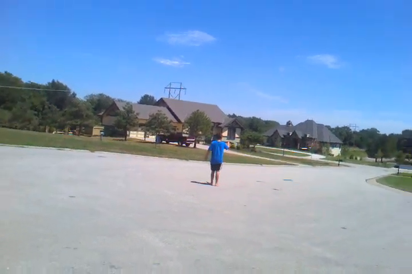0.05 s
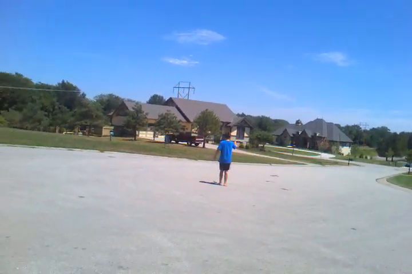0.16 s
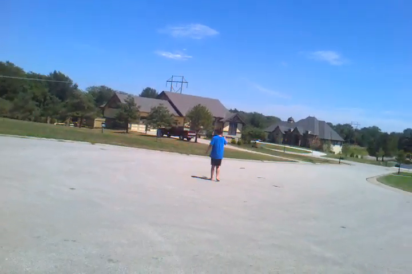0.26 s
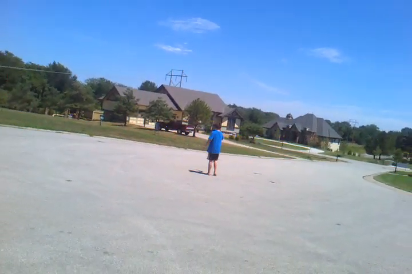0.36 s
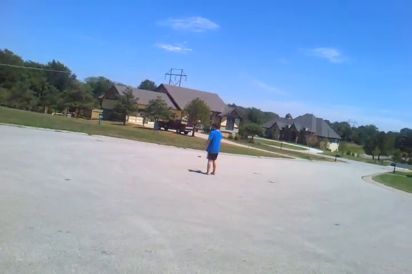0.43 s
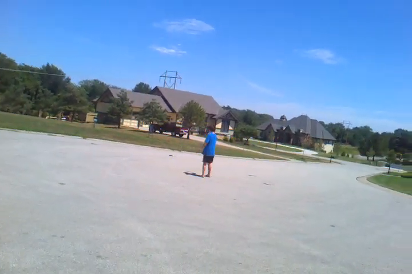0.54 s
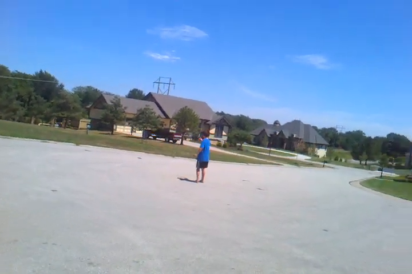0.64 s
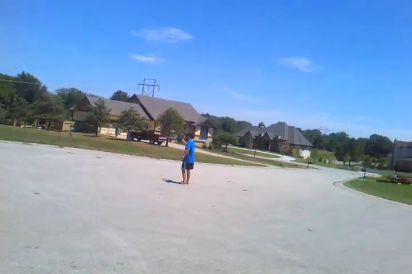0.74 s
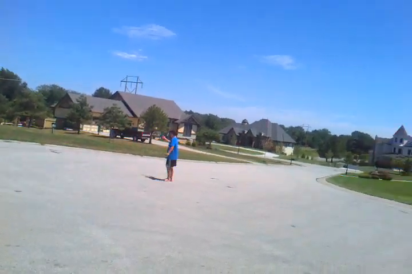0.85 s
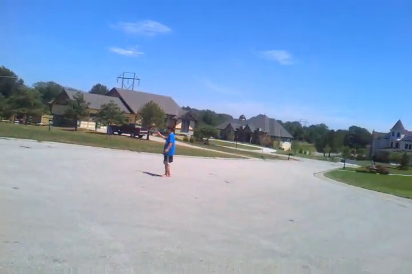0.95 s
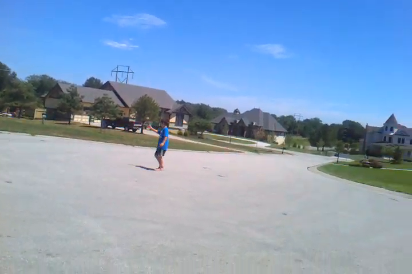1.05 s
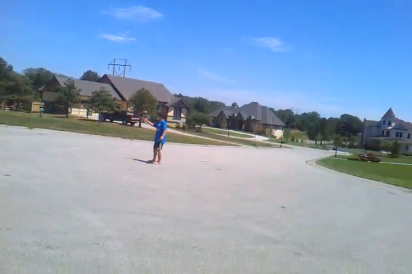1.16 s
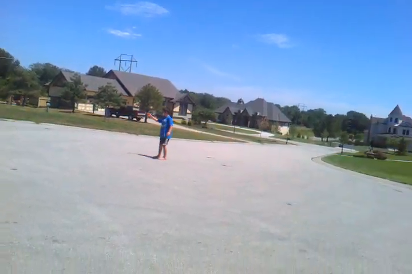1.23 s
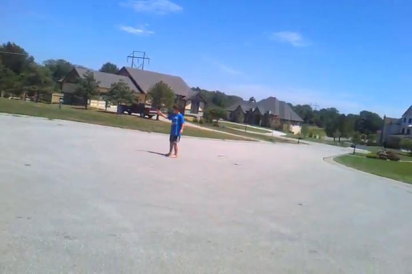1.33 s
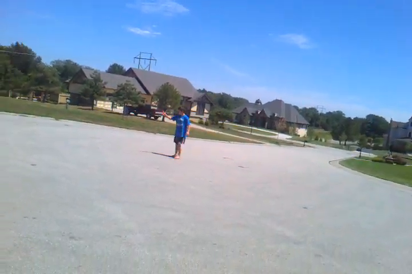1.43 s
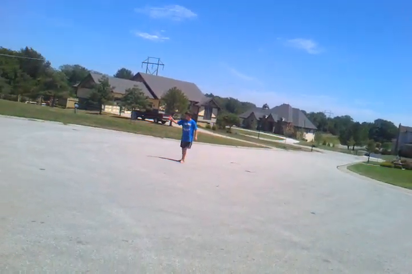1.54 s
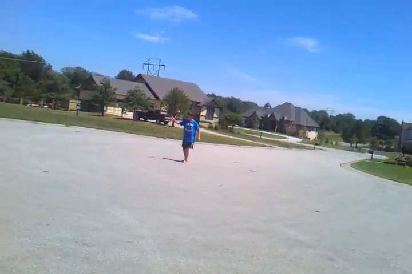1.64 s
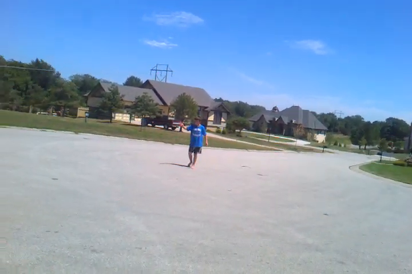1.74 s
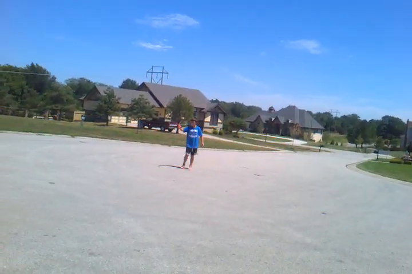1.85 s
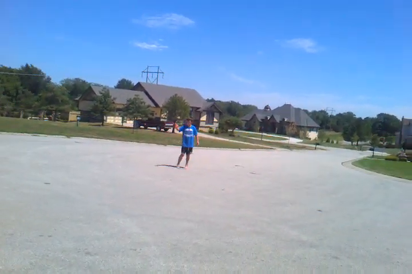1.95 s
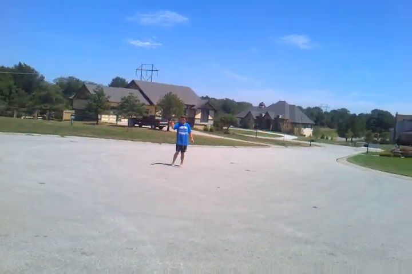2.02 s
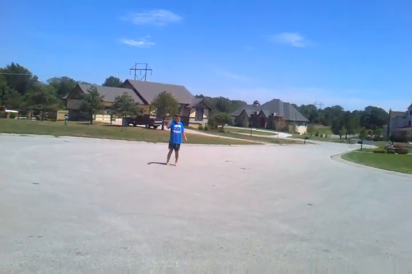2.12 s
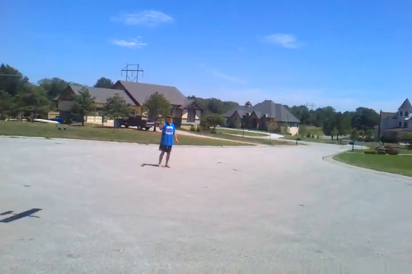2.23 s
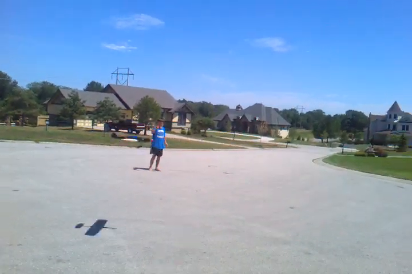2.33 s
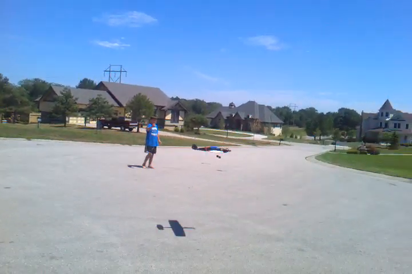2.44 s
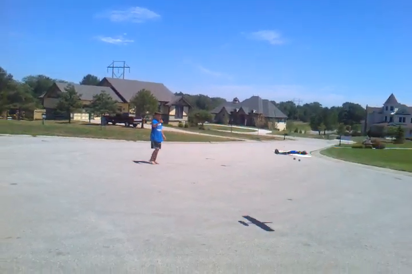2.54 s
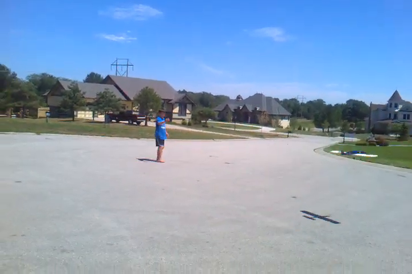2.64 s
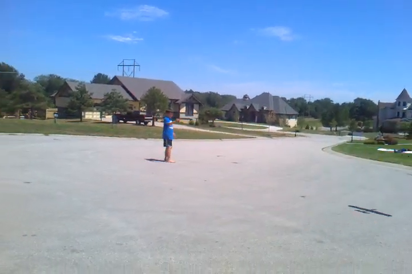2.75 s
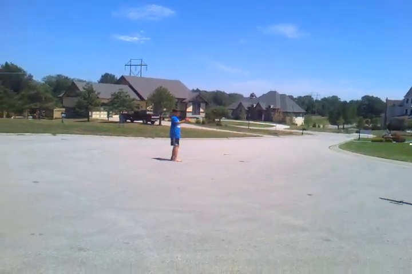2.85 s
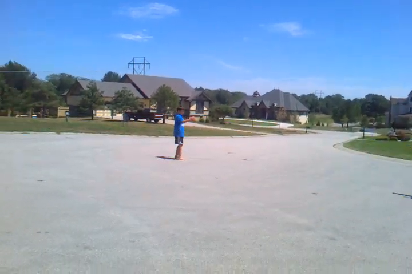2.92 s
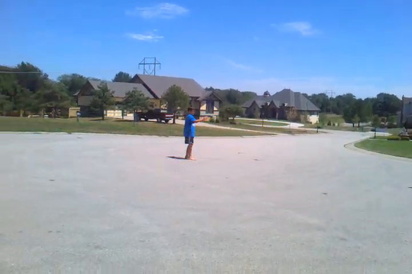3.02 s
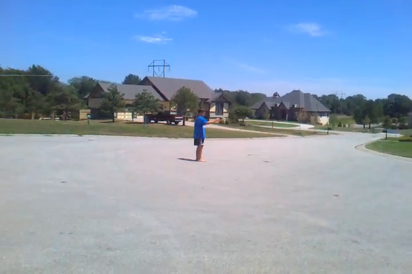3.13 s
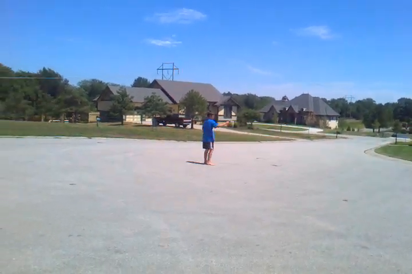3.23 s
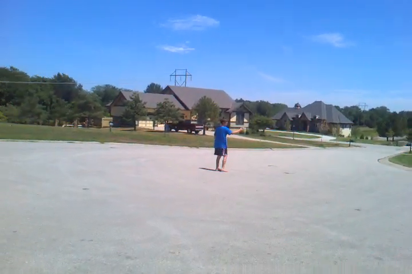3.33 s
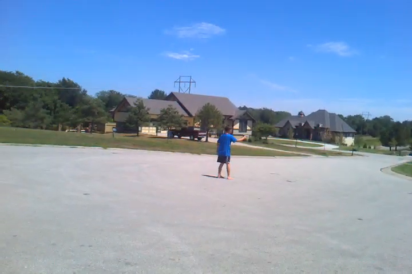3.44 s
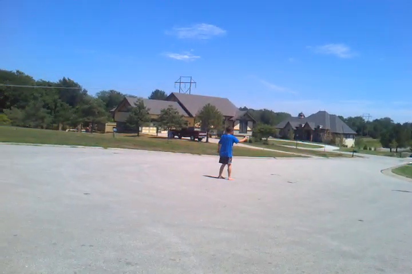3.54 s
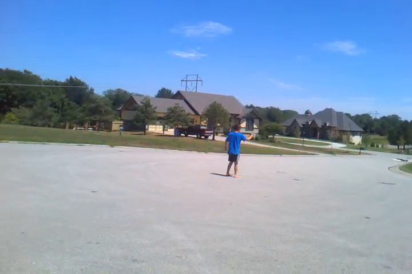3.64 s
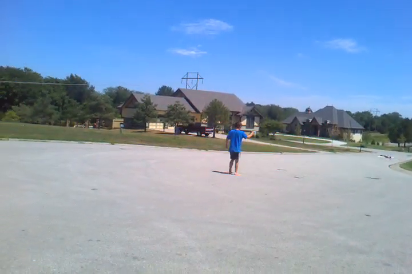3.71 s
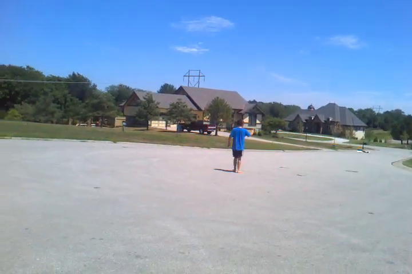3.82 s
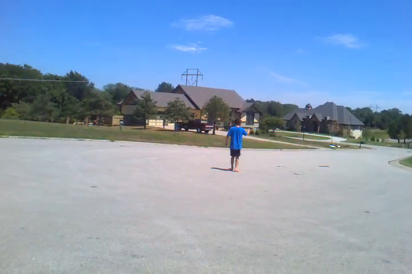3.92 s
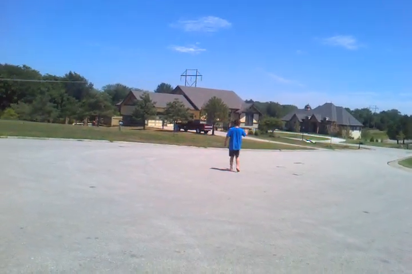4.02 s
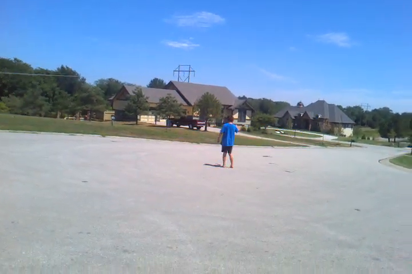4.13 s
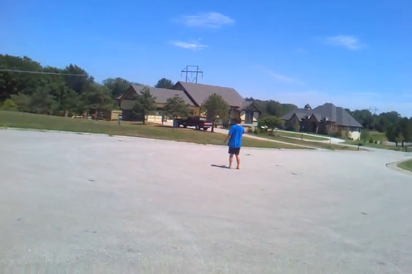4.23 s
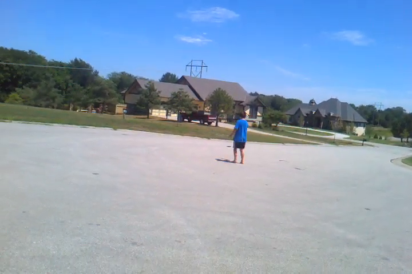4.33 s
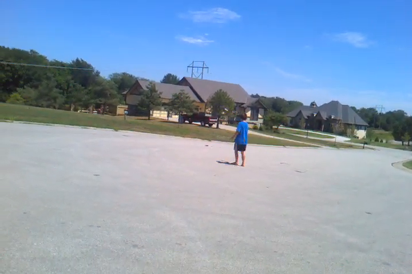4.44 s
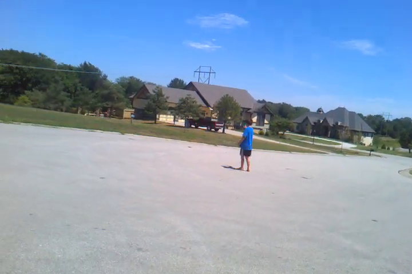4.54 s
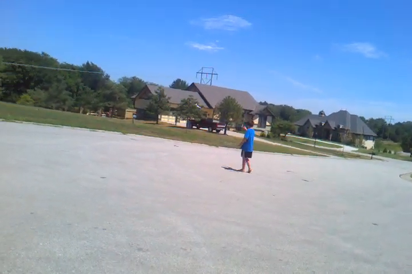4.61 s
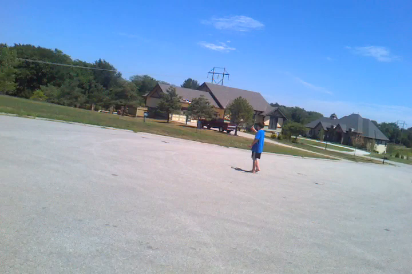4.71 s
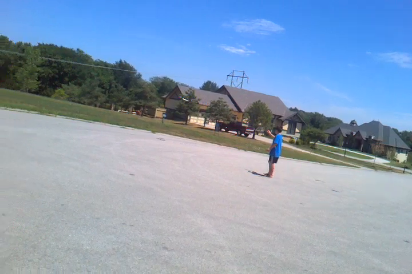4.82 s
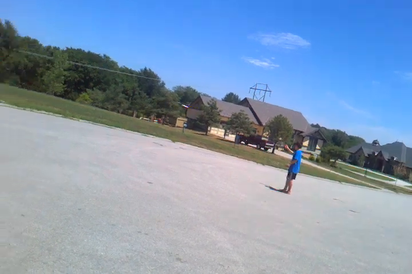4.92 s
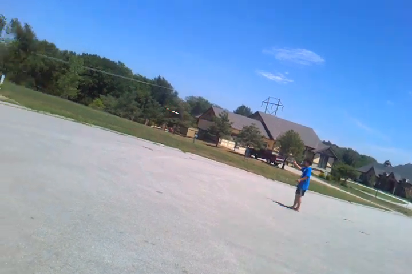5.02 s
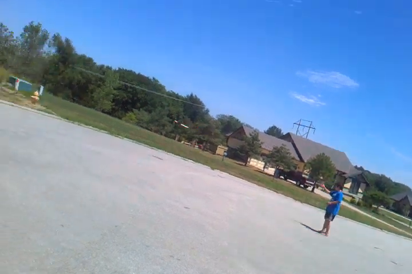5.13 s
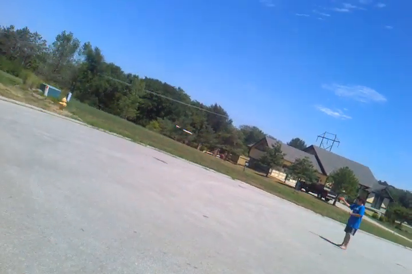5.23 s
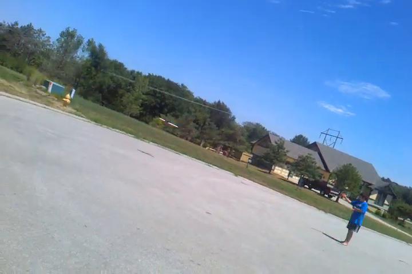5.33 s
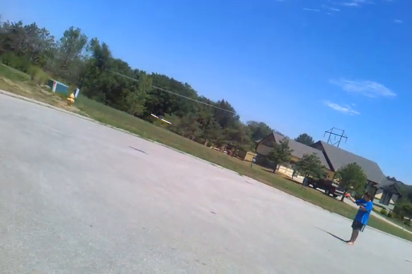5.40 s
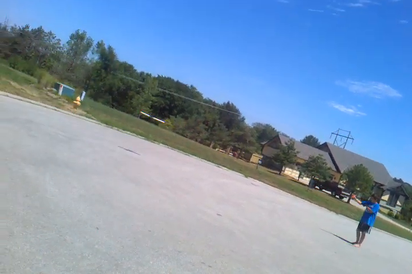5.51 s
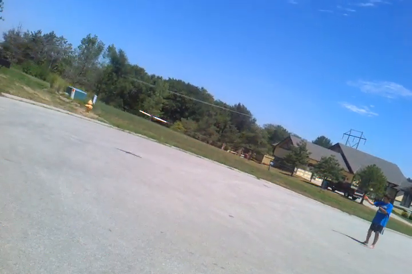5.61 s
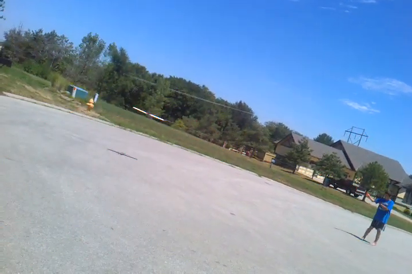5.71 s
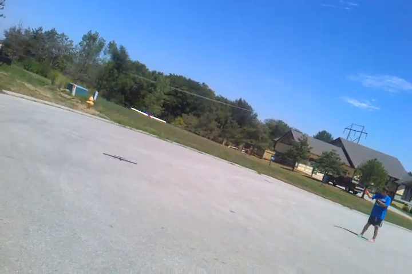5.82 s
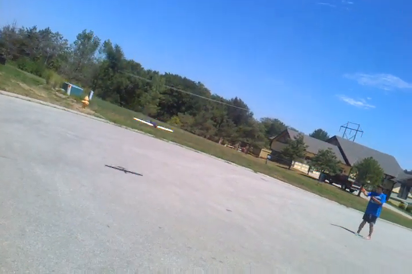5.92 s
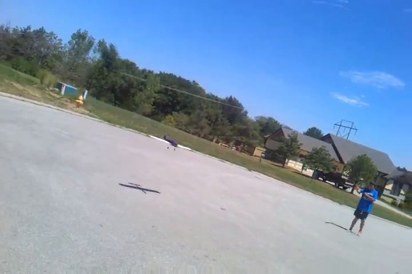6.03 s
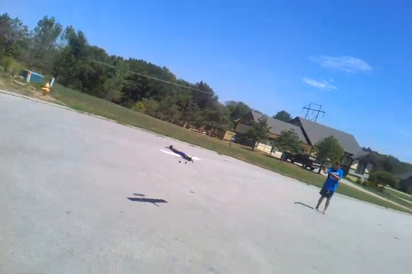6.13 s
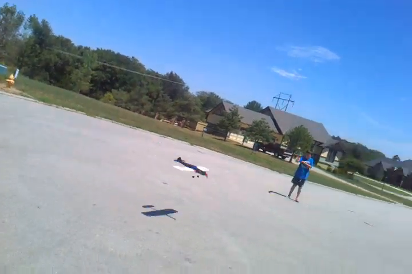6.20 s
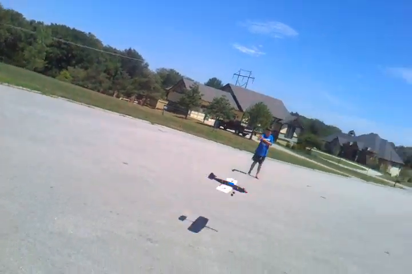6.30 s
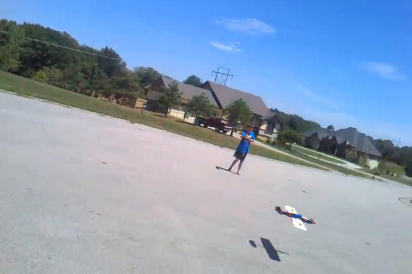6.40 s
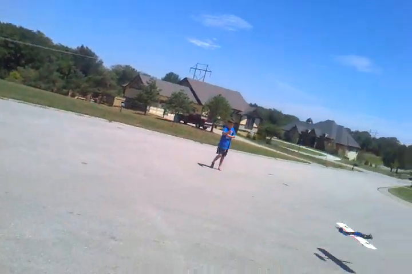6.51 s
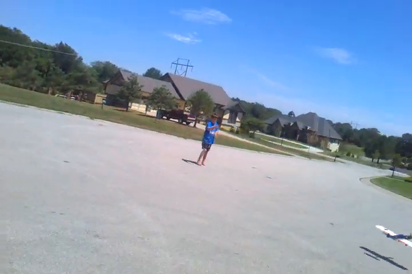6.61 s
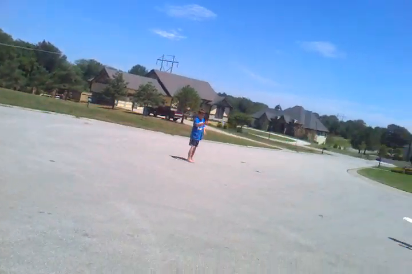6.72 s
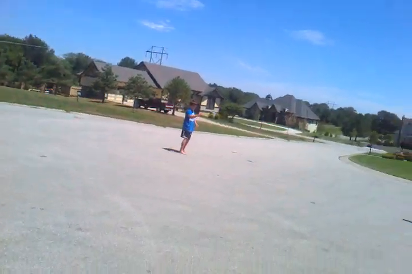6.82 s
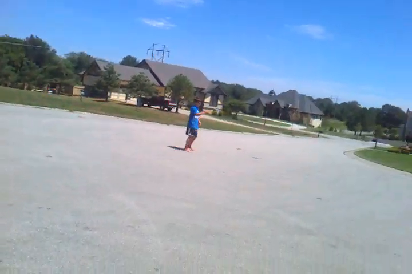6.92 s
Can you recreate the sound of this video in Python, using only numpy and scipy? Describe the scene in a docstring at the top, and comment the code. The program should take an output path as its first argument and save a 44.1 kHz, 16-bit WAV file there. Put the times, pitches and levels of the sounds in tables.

```python
"""A small two-stroke engine buzzes at full throttle as a control-line model airplane flies nearly two laps.
Each firing rings the muffler under clean low orders and propeller rush, with a few brief bright noise ticks.
The bounce off the paved street sweeps a comb through the buzz as the plane climbs and dips.
Houses and trees scatter it back over a faint street bed; gusts buffet the two ports of a hand-held camera."""
import sys
import numpy as np
from scipy import signal
from scipy.fft import rfft, irfft, next_fast_len
from scipy.io import wavfile
from scipy.ndimage import map_coordinates

SR = 44100
rng = np.random.default_rng(int(sys.argv[2]) if len(sys.argv) > 2 else 0)


def pcm_store(signal):
    """Save signal as 16-bit PCM."""
    levels = np.round(np.clip(np.atleast_2d(signal), -1, 1) * 32767)
    wavfile.write(sys.argv[1], SR, levels.astype(np.int16).T)


N = 306936
TIME = np.arange(N) / SR   # seconds

# The engine's firing rate as heard, Doppler shift included: time_s, firing_hz
HEARD_FIRING_RATE = [(0.0, 200.4), (0.08, 202.4), (0.13, 206), (0.23, 209.1), (0.37, 201.5), (0.43, 200),
                     (0.54, 203.3), (0.64, 198.4), (0.72, 203.5), (0.79, 204.3), (0.83, 200), (1.05, 204.4),
                     (1.08, 200.3), (1.39, 206.8), (1.47, 203.3), (1.76, 208.4), (1.8, 210.3), (1.92, 215),
                     (1.98, 212.3), (2.11, 217.5), (2.19, 209.5), (2.34, 214.9), (2.48, 212.6),
                     (2.6, 206.6), (2.71, 211.2), (2.89, 215.2), (3.1, 201.3), (3.24, 206.5), (3.31, 202.1),
                     (3.43, 208.4), (3.55, 206.9), (3.7, 202.4), (3.78, 201.8), (3.91, 203.6), (3.99, 201),
                     (4.09, 203.4), (4.17, 211.3), (4.21, 212.0), (4.3, 203.4), (4.46, 210.6),
                     (4.54, 205.1), (4.77, 199.5), (4.96, 205.7), (5.0, 200.7), (5.12, 202.9),
                     (5.37, 213.4), (5.43, 213.8), (5.52, 206.3), (5.7, 209.7), (5.8, 213.7), (5.89, 212.7),
                     (5.99, 206.6), (6.09, 210.5), (6.16, 216.3), (6.32, 217.7), (6.42, 213.1),
                     (6.57, 210.8), (6.69, 205.9), (6.9, 210.6), (6.96, 204.7)]
# Cycles that fail to fire, against a normal firing: time_s, level_db
MISFIRES = [(0.351, -6), (0.466, -6), (0.836, -6), (1.08, -5), (1.159, -7), (1.404, -7), (1.487, -9),
            (1.599, -7), (1.687, -6), (2.006, -8), (2.436, -7), (2.46, -7), (2.521, -6), (2.53, -8),
            (2.931, -6), (2.942, -5), (2.959, -6), (2.969, -5), (3.028, -6), (3.156, -6), (3.238, -7),
            (3.292, -5), (3.303, -10), (3.312, -5), (3.543, -7), (5.096, -6), (5.442, -10), (5.692, -6),
            (5.759, -7), (5.833, -9), (5.843, -11), (5.853, -5), (5.876, -5), (5.904, -9), (5.922, -6),
            (6.421, -9), (6.557, -6)]
# Unevenness of the firings: spread in strength, spread in timing
FIRING_SPREAD_DB, FIRING_JITTER_MS = 0.65, 0.003
# Share of firings (0-1) that burn weakly, and their change in level
WEAK_SHARE, WEAK_DB = 0.03, -4
# The gas puff trails the pressure pulse
PUFF_LAG_S = 0.0005

# Exhaust resonances, before the directional levels: centre_hz, width_hz, level_db
MUFFLER_RESONANCES = [(740, 378, 1.26), (1474, 426, -2.5), (2196, 1025, 1.08), (2698, 421, 7),
                      (2900, 348, 3.5), (3827, 576, -3.5), (4444, 740, -10), (6960, 1080, -10),
                      (6910, 1600, -11), (9080, 710, -11.5), (13350, 1500, -27)]
# Fast flicker in how hard each resonance is struck: resonance_hz, spread_db
CRACKLE_SPREAD = [(1000, .9), (2600, .6), (4500, .5), (7000, 1.3)]
# Gas noise against the pulse: resonance_hz, level_db
GAS_SHARE = [(1000, -16), (1500, -18), (3000, -27), (4500, -29), (6500, -20), (9400, -9), (13000, -4)]
# What the exhaust beams each way; 0 is head-on, 90 the outer wing, 180 tail-on:
# aspect_degrees, body_db, bark_db, ring_db, rasp_db, sizzle_db
EXHAUST_BEAM = [(0.0, 4, 4.5, 5.5, 0.5, 7), (20.0, 2.5, 4.0, 4.5, 0, 6), (45.7, 3.5, 4, 2, 1.5, 9),
                (91, 3.0, 1, -0.5, -0.5, 4.5), (140, 2, -2.5, -6, 2.5, 6.5), (165.0, -2, -4.5, -3, 3, 8),
                (190, 0, -6, -9, -1, 0.5), (208.8, 3.5, -3.5, -5, 0.5, 4), (227.9, -2.0, -9, -17, -0.5, -1),
                (241.8, 1.5, -3, -9, 2.5, 3.5), (266, 1, 0.5, 0.5, -0.0, -1),
                (285.7, 5.0, 3.5, 3.5, 2, 3.5), (319, 4.5, 6.5, 3.5, 1.0, 6)]
# Where body, bark, ring, rasp and sizzle meet: edge_hz
BEAM_EDGES_HZ = [1800, 2850, 3400, 5500]
# Change straight beside the camera: body_db, bark_db, ring_db, rasp_db, sizzle_db
OFF_AXIS_DB = [-0.5, -1.5, 0.5, -9.5, 1.5]
# Share (0-1) of the 1/distance swell that is heard
SWELL_SHARE = 0.36
# Moving air makes each resonance and the street bounce swell and fade: spread of each
SHIMMER_DB, BOUNCE_WAVER_DB = 0.9, 1.3

# Lowest orders of propeller and exhaust each way: aspect_degrees, first_db, second_db, third_db, fourth_db
DRONE_ORDERS = [(0, -42.5, -42.5, -51.5, -60.5), (35, -40, -41.5, -47.5, -58), (100, -40, -42, -56.5, -77),
                (154, -43, -42, -52.5, -49), (205, -47, -48.5, -59, -74), (258, -46.5, -54.5, -69, -54.5),
                (295, -44.5, -50, -68, -52), (326, -44, -44.5, -46.5, -65)]
# Colour of the air rushing through the propeller: frequency_hz, level_db (per Hz)
RUSH_COLOUR = [(300, -22), (1000, -7), (2500, -11), (5200, -11), (7000, -1), (9800, 4.7), (11000, -5),
               (12000, 1), (14000, -13)]
RUSH_DB = -45.3   # before the swing with direction
# Brief bright noise ticks, before their fade and low cut: time_s, level_db
BRIGHT_TICKS = [(0.154, -22), (1.01, -26), (1.41, -24), (4.879, -28), (5.06, -31), (6.6, -27)]

# The circle: length of the lines, camera to pilot, time for a lap, first closest pass
LINES_M, PILOT_M, LAP_S, PASS_S = 5.93, 10.135, 3.9, 2.48
# Height of the plane above the street: time_s, height_m
PLANE_HEIGHT = [(0.0, 1.17), (0.25, 1.024), (0.5, 0.77), (0.85, 0.67), (1.0, 0.61), (1.3, 0.72),
                (1.6, 0.86), (1.98, 1.2), (2.2, 1.11), (2.35, 1.02), (2.5, 0.78), (2.75, 0.77), (3.2, 0.94),
                (3.5, 0.78), (3.82, 0.46), (4.05, 0.59), (4.3, 0.82), (4.5, 1.255), (4.75, 1.37),
                (5.05, 1.324), (5.4, 0.94), (5.7, 0.89), (5.95, 0.866), (6.2, 0.65), (6.35, 0.49),
                (6.5, 0.37), (6.62, 0.32), (6.8, 0.41), (6.96, 0.51)]
# Where the camera points, left being positive: time_s, turn_degrees
CAMERA_TURN = [(0.0, -1), (0.8, -7.0), (1.6, -11.5), (2.2, -2.0), (2.7, -9), (3.5, -3.0), (4.6, 0.0),
               (5.25, 19.5), (6.0, 22.5), (6.3, 5.5), (6.55, -8.5), (6.8, -7.5)]
# Height of the camera, and travel time between its ports for sound from straight beside it
CAMERA_M, PORTS_MS = 1.452, 0.3
SOUND_M_PER_S = 343
# The hand reflects a little into the right port: strength (gain), delay
HAND_ECHO, HAND_MS = 0.34, 0.665

# Colour of the distant street and leaves: frequency_hz, level_db (per Hz)
STREET_COLOUR = [(60, -30), (150, 5), (300, 6), (700, -2), (1500, 5), (4000, -2), (9000, -20), (14000, -10)]
SCATTER_DB = -19   # gain of the returns from houses and trees

# Gusts on the ports, as wind strength: start_s, hold_s, strength_db
GUSTS = [(1.318, 0.1, -40), (1.485, 0.2, -57), (4.299, 0.031, -39.5), (4.37, 0.14, -48), (4.64, 0.096, -24),
         (4.866, 0.018, -29.5), (4.918, 0.14, -40), (5.206, 0.039, -47), (5.398, 0.039, -39),
         (5.48, 0.058, -31.5), (5.603, 0.024, -25), (5.654, 0.032, -26), (5.718, 0.11, -30),
         (5.949, 0.029, -35), (6.024, .12, -35), (6.194, 0.086, -42), (6.322, 0.021, -35),
         (6.633, 0.01, -49), (6.733, 0.016, -37), (6.843, 0.025, -39), (6.928, 0.023, -34)]
# Rates at which every gust builds and dies away
GUST_RISE_DB_PER_S, GUST_FALL_DB_PER_S = 800, 520
# Breeze between gusts: wind strength and its spread
BREEZE_DB, BREEZE_SPREAD_DB = -87, 3.5
LUMPY_DB = 6   # spread of the wind's lumps before their peaks are capped
# Single eddies that slap a port, before a common gain: time_s, level_db
EDDY_SLAPS = [(4.643, -33), (4.673, -24), (4.699, -33), (4.72, -31), (4.866, -42), (5.62, -29),
              (5.658, -34), (5.676, -24), (6.204, -34), (6.33, -32)]

# Colour of the camera microphone: frequency_hz, gain_db
MICROPHONE_COLOUR = [(200.0, -4), (600.0, -4.57), (900.0, -0.5), (1400.0, -1.58), (2200.0, 0.4),
                     (3000.0, -7.5), (4200.0, 2.5), (5300.0, -2.2), (6300.0, 6), (8000.0, -1.35),
                     (10000.0, -1.5), (11000.0, 1.9), (12000.0, 7), (14000.0, -3)]
# Colour of the widened left-right difference: frequency_hz, gain_db
WIDTH_COLOUR = [(300.0, -2.2), (700.0, 0.5), (2000.0, 1), (2500.0, -0.2), (2950.0, 8), (3600.0, 0.5),
                (6300.0, 1.5), (9000.0, -2.5), (12000.0, -2.7)]
# Stereo widening: share (0-1) of each port taken from the other, and how late; then the top cut
CROSSFEED, CROSSFEED_MS, CUTOFF_HZ = 0.946, 0.34, 14050


def from_db(db):
    """Decibels to gain."""
    return 10 ** (np.asarray(db) / 20)


def rms_one(x):
    """Scale to unit power."""
    return x / np.sqrt(np.mean(x ** 2) + 1e-20)


def in_time(rows):
    """The columns of a curve at every sample."""
    s, *columns = np.transpose(rows)
    return [np.interp(TIME, s, column) for column in columns]


def cut(x, hz, kind, order=2):
    """Butterworth filter."""
    return signal.sosfilt(signal.butter(order, hz, kind, fs=SR, output="sos"), x)


def coloured(x, spectrum):
    """Apply a smooth (Hz, dB) curve, drawn over log frequency."""
    size = next_fast_len(N + SR // 10)
    hz, db = np.transpose(spectrum)
    bins_hz = np.maximum(np.fft.rfftfreq(size, 1 / SR), 1)
    gain = from_db(np.interp(np.log(bins_hz), np.log(hz), db))
    return irfft(rfft(x, size) * gain, size)[..., :N]


def drift(rate_hz):
    """Smooth chance with spread 1, made of noise below the given rate."""
    return rms_one(cut(rng.standard_normal(N + SR), rate_hz, "low")[SR:])


def fade(x, decay_s):
    """Let every impulse die away exponentially."""
    return signal.lfilter([1], [1, -np.exp(-1 / (decay_s * SR))], x + 1e-18)


def resonate(x, hz, width_hz):
    """Two-pole resonance with gain 1 on top."""
    r = np.exp(-np.pi * width_hz / SR)
    feed = np.array([1, 0, -1]) * (1 - r * r) / 2
    feedback = [1, -2 * r * np.cos(2 * np.pi * hz / SR), r * r]
    return signal.lfilter(feed, feedback, x + 1e-18)


def delayed(x, ms):
    """Read the signal a fixed or moving time later."""
    return map_coordinates(x, [np.arange(N) - ms * SR / 1000], order=3, mode="nearest")


def flight():
    """Plane on its circle: distance (m), side shown (degrees), angle left of the lens (radians)."""
    angle = 2 * np.pi * (TIME - PASS_S) / LAP_S
    left_m = -LINES_M * np.sin(angle)
    ahead_m = PILOT_M - LINES_M * np.cos(angle)
    bearing = np.arctan2(left_m, ahead_m)
    turn_degrees, = in_time(CAMERA_TURN)
    aspect_degrees = np.degrees(angle - bearing + np.pi / 2)
    return np.hypot(left_m, ahead_m), aspect_degrees, bearing - np.radians(turn_degrees)


def travel():
    """Swing of the sound's travel time as the plane comes and goes (ms), zero at both ends."""
    ms = 1000 * flight()[0] / SOUND_M_PER_S
    return ms - np.linspace(ms[0], ms[-1], N)


def beam():
    """Body, bark, ring, rasp and sizzle (dB) follow the side shown, the distance and the angle to the lens."""
    distance_m, aspect_degrees, off_axis = flight()
    near_db = SWELL_SHARE * 20 * np.log10(PILOT_M / distance_m)
    degrees, *patterns = np.transpose(EXHAUST_BEAM)
    levels = []
    for pattern_db, beside_db in zip(patterns, OFF_AXIS_DB):
        lobe_db = np.interp(aspect_degrees, degrees, pattern_db, period=360)
        levels.append(lobe_db + near_db + beside_db * np.sin(off_axis) ** 2)
    return levels


def firings(turns):
    """One pressure pulse a turn: most are nearly alike, some burn weakly, a few misfire."""
    when_s = np.interp(np.arange(1, int(turns[-1])), turns, TIME)
    chance = rng.standard_normal((len(when_s), 2))
    weak = rng.random(len(when_s)) < WEAK_SHARE
    level_db = FIRING_SPREAD_DB * chance[:, 0] + WEAK_DB * weak
    for s, db in MISFIRES:
        level_db[np.abs(when_s - s).argmin()] = db
    strength = from_db(level_db)
    at = np.clip((when_s + FIRING_JITTER_MS * chance[:, 1] / 1000) * SR, 0, N - 2)
    # share each pulse between two samples to keep its exact timing
    pulses, whole = np.zeros(N), at.astype(int)
    pulses[whole] = strength * (1 - at % 1)
    pulses[whole + 1] = strength * (at % 1)
    return rms_one(pulses)


def gas_noise(pulses, puff_s, steady):
    """Turbulence bursts out just after each pulse and dies away, over a steady hiss."""
    puff = fade(np.roll(pulses, round(PUFF_LAG_S * SR)), puff_s)
    return rms_one((rms_one(puff) + steady) * rng.standard_normal(N))


def exhaust(pulses):
    """Pulses and gas ring the muffler; each resonance follows the side shown and bends with Doppler shift."""
    travel_ms, lobes_db = travel(), beam()
    fired = delayed(pulses, -delayed(travel_ms, -travel_ms))   # the pulses as they leave the plane
    gas = gas_noise(fired, puff_s=0.0016, steady=0.7)
    out = np.zeros(N)
    for k, (hz, width_hz, level_db) in enumerate(MUFFLER_RESONANCES):
        beam_db = lobes_db[np.searchsorted(BEAM_EDGES_HZ, hz)] + SHIMMER_DB * drift(5)
        crackle = from_db(np.interp(hz, *np.transpose(CRACKLE_SPREAD)) * drift(90))
        gas_gain = from_db(np.interp(hz, *np.transpose(GAS_SHARE)))
        ring = resonate(crackle * fired + gas_gain * gas, hz, width_hz)
        out += (-1) ** k * from_db(level_db + beam_db) * ring   # alternate polarity
    return from_db(-21) * delayed(cut(out, 1204, "high", order=4), travel_ms)


def drone(turns):
    """Clean low orders of the firing rate, each a sine with its own lobes around the plane."""
    aspect_degrees = flight()[1]
    degrees, *orders = np.transpose(DRONE_ORDERS)
    out = np.zeros(N)
    for order, db in enumerate(orders, start=1):
        lobe = from_db(np.interp(aspect_degrees, degrees, db, period=360))
        out += lobe * np.sin(2 * np.pi * order * turns)
    return out


def bounce_lag():
    """The extra way via the pavement (ms) grows as the plane climbs or nears."""
    height_m, = in_time(PLANE_HEIGHT)
    return 1000 * 2 * height_m * CAMERA_M / flight()[0] / SOUND_M_PER_S


def pavement(x, bounce, dull_db):
    """The direct sound and its duller, wavering mirror image under the street."""
    strength = np.minimum(bounce * from_db(BOUNCE_WAVER_DB * drift(7)), 0.9)
    dull = coloured(x, [(4000, 0), (14000, dull_db)])
    return x + strength * delayed(dull, bounce_lag())


def at_ports(x):
    """The nearer port hears the plane first; the right one also catches an echo off the hand."""
    left_lead_ms = PORTS_MS * np.sin(flight()[2])
    left, right = delayed(x, -left_lead_ms / 2), delayed(x, left_lead_ms / 2)
    return np.array([left, right + HAND_ECHO * delayed(right, HAND_MS)])


def propeller(pulses):
    """Turbulence from the disc throbs with every firing, flutters, and bounces faintly off the street."""
    _, bark_db, *_, sizzle_db = beam()
    ports = []
    for _ in range(2):   # separate turbulence at each port
        turbulence = gas_noise(pulses, puff_s=0.0025, steady=1.8)
        ports.append(pavement(turbulence, bounce=0.35, dull_db=-4))
    rush_db = RUSH_DB + 0.35 * bark_db + 0.7 * sizzle_db + 1.3 * drift(10)
    return from_db(rush_db) * rms_one(coloured(np.array(ports), RUSH_COLOUR))


def houses(x, t60, first_s, dull_hz):
    """Walls and trees scatter the sound as decaying noise, different at each port in the treble."""
    t = np.arange(SR) / SR
    envelope = from_db(-60 * t / t60) * np.clip(t / first_s - 1, 0, 1)   # silent until first_s
    tails = rng.standard_normal((2, SR)) * envelope
    apart = cut(tails[1], 5600, "high", order=1)
    ports = cut(np.array([tails[0] + apart, tails[0] - apart]), dull_hz, "low", order=1)
    ports /= np.sqrt(np.sum(ports ** 2) / 2)
    led_in = np.pad(x, (SR, 0), "reflect")   # the returns are already sounding at the start
    return signal.fftconvolve(led_in[None], ports, axes=1)[:, SR:SR + N]


def street():
    """Distant street and leaves: coloured noise, partly shared by the ports, slowly swelling and fading."""
    air = rng.standard_normal((3, N))
    ports = coloured(air[2] + from_db(-4.5) * air[:2], STREET_COLOUR)
    bed = from_db(-42.5) * rms_one(cut(ports, 128, "high", order=6))
    return bed * from_db(1.5 * drift(5))


def ticks(decay_s=0.0028):
    """A short, bright noise burst at each listed time."""
    bursts = np.zeros(N)
    for s, db in BRIGHT_TICKS:
        bursts[round(s * SR)] = from_db(db)
    return cut(fade(bursts, decay_s) * rng.standard_normal(N), 2600, "high")


def gusts():
    """Wind strength (dB): gusts build, hold and die back into a restless breeze."""
    strength_db = BREEZE_DB + BREEZE_SPREAD_DB * drift(11)
    for s, hold_s, db in GUSTS:
        rise_db = GUST_RISE_DB_PER_S * (s - TIME)
        fall_db = GUST_FALL_DB_PER_S * (TIME - s - hold_s)
        below_db = np.maximum(np.maximum(rise_db, fall_db), 0)
        strength_db = np.maximum(strength_db, db - below_db)
    return strength_db


def wind(rumble_growth=0.5, flutter_growth=1.03):
    """Eddies rumble at each port on its own; strong gusts flutter higher up."""
    over_db = gusts() + 21
    ports = []
    for white in rng.standard_normal((2, 2, N)):
        rumble = rms_one(cut(white[0], [65, 200], "band", order=3))
        flutter = rms_one(cut(white[1], [200, 440], "band", order=3))
        rumble = from_db(-27 + rumble_growth * over_db) * rumble
        flutter = from_db(-30 + flutter_growth * over_db) * flutter
        lumps = from_db(LUMPY_DB * np.minimum(drift(48), 1))
        ports.append((rumble + flutter) * lumps)
    return np.array(ports)


def thumps(hz=300, width_hz=230, gain_db=12):
    """A single strong eddy slaps one port or the other: a softened click rings a broad low resonance."""
    hits = np.zeros((2, N))
    slap = resonate(cut(signal.unit_impulse(SR // 20), 480, "low", order=4), hz, width_hz)
    slap /= np.abs(slap).max()
    for (s, db), port in zip(EDDY_SLAPS, rng.integers(0, 2, len(EDDY_SLAPS))):
        hits[port, round(s * SR)] = from_db(db + gain_db)
    return signal.fftconvolve(hits, slap[None], axes=1)[:, :N]


def scene():
    """The pressure at the camera's two ports."""
    firing_hz, = in_time(HEARD_FIRING_RATE)
    turns = np.cumsum(firing_hz * (1 + 0.0012 * drift(12))) / SR   # slight wander in pitch
    pulses = firings(turns)
    buzz = exhaust(pulses) + ticks()
    arriving = pavement(buzz, bounce=0.62, dull_db=-11)
    arriving = arriving + pavement(drone(turns), bounce=0.66, dull_db=-12)
    plane = at_ports(arriving) + propeller(pulses)
    scattered = from_db(SCATTER_DB) * houses(buzz, t60=0.36, first_s=0.0066, dull_hz=5540)
    return plane + scattered + street() + wind() + thumps()


def record(dry):
    """The camera widens its stereo by taking from each port a late copy of the other, then cuts lows and top."""
    late_other = np.array([delayed(port, CROSSFEED_MS) for port in dry[::-1]])
    left, right = dry - CROSSFEED * late_other
    mid, side = (left + right) / 2, coloured((left - right) / 2, WIDTH_COLOUR)
    toned = coloured(cut(np.array([mid + side, mid - side]), 62, "high"), MICROPHONE_COLOUR)
    top_cut = signal.firwin(601, CUTOFF_HZ, fs=SR, window="blackman")
    return signal.fftconvolve(toned, top_cut[None], "same", axes=1)


dry = scene()
out = record(dry)
pcm_store(out)
```